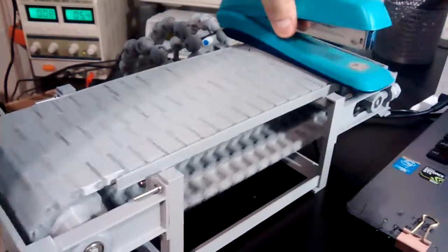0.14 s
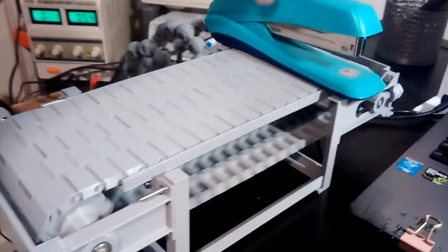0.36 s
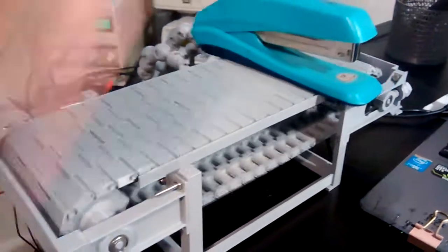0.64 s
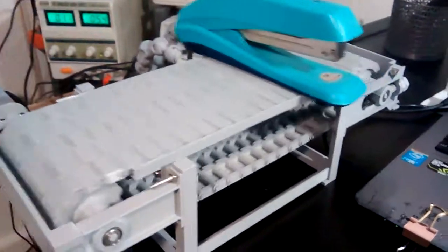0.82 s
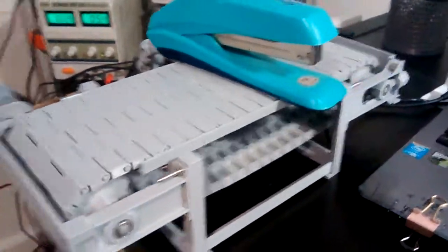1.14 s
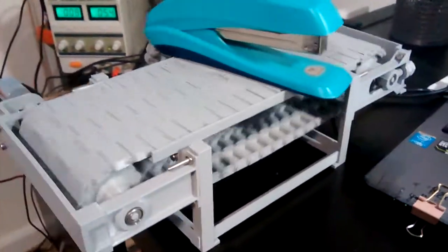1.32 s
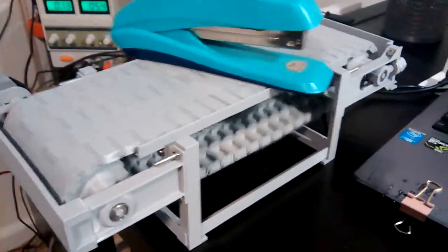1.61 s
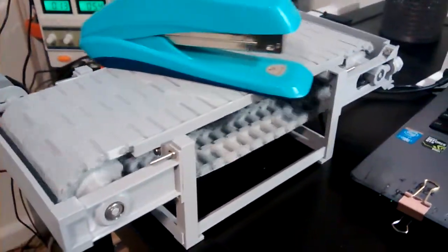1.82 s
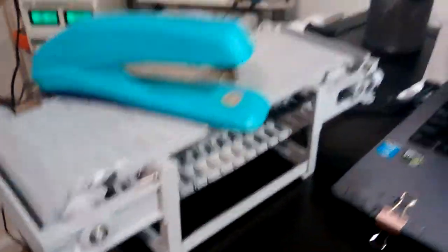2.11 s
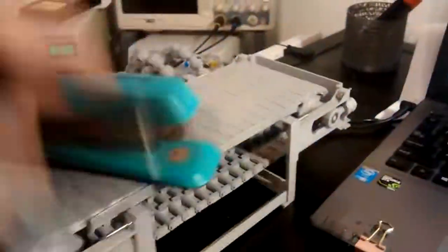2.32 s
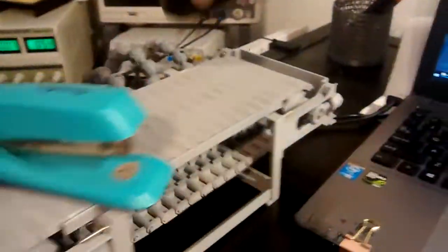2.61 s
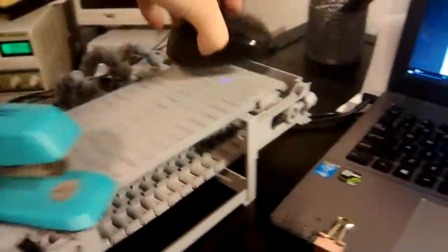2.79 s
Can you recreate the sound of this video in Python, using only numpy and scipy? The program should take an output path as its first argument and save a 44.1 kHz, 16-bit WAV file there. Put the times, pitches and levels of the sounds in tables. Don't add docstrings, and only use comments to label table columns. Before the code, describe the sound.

Plastic chain links rattle and crack over sprockets above a bright gear whirr and low hum, snaps crowding together around two seconds, then a soft object thud; recorded very close in stereo in a small room.

```python
import sys
import numpy as np
from scipy import signal
from scipy.fft import rfft, irfft, next_fast_len
from scipy.io import wavfile
from scipy.ndimage import map_coordinates

SR = 44100
rng = np.random.default_rng(int(sys.argv[2]) if len(sys.argv) > 2 else 0)


def gain_from_decibels(decibels):
    exponent = np.asarray(decibels, float) / 20
    return 10 ** exponent


def put_to_file(sound):
    columns = np.atleast_2d(sound).T
    safe = np.clip(columns, -1, 1)
    whole_steps = np.round(safe * 32767)
    wavfile.write(sys.argv[1], SR, whole_steps.astype(np.int16))


N = 130095
TIME_S = np.arange(N) / SR
PAD = next_fast_len(N + SR // 2)
HZ = np.arange(PAD // 2 + 1) * SR / PAD + 1e-3

# start_s, level_db
LOAD = [(0, -45.5), (.45, -45.5), (.9, -44), (1.15, -44), (1.8, -44.5), (2.2, -45), (2.3, -47.5),
        (2.6, -48), (2.95, -45.5)]
# pitch_hz, density_db_per_hz
WHIRR_COLOUR = [(150, -0.5), (1500, -6), (2600, -12.5), (3700, -8), (6500, -6), (10800, -6.5),
                (12300, -10.5), (15000, -5.5), (16000, -25)]
# pitch_hz, level_db, t60_s
GEAR_WHISTLES = [(4940, 1, 0.013), (5630, -14, 0.066), (6910, 10.5, 0.029), (8840, -2, 0.01),
                 (11400, -3.5, 0.017)]
# pitch_hz, level_db, t60_s
FRAME = [(193, -8.5, 0.038), (273.3, -1.5, 0.15), (344, 3.5, 0.27), (401, -3.5, 0.06), (496, 0, 0.068),
         (565.4, -4.5, 0.065), (717, -5, 0.031), (816, -8, 0.044), (902, -4, 0.049), (1201, -11, 0.04),
         (1393, -16, 0.016), (1785, -10.5, 0.048), (2067, -12, 0.009)]
# pitch_hz, level_db, t60_s
RUMBLE = [(38, -14.5, 0.038), (55.3, 1.5, 0.24), (106.2, -2, 0.13), (132.2, -3.5, 0.41)]
# start_s, pitch_hz, level_db
MOTOR_HUM = [(0, 347.3, -65), (.09, 346.6, -49), (.22, 344.3, -49), (.3, 345, -83), (.48, 344, -48.5),
             (.7, 344, -58), (.9, 343, -61), (1.1, 341, -58), (1.3, 338, -74), (1.52, 344, -52),
             (1.66, 336.3, -74), (1.85, 341, -55), (2.1, 339.5, -57.5), (2.4, 338.3, -56),
             (2.65, 341.4, -56.5), (2.8, 340.6, -53.5), (2.95, 344.6, -51)]
# start_s, crack_db,
# link_ring_db, frame_boom_db, desk_thump_db
LINK_SNAPS = [(0.0149, -25, -40, -14, -14.5), (0.044, -21, -33, -22, -17.5),
              (0.2162, -27.5, -17, -5.5, -8), (0.282, -19.5, -3, -16, -15.5),
              (0.3643, -24, -24.5, -13, -11), (0.374, -27.5, -50, -38, -54),
              (0.5057, -25.5, -19, -13, -13), (0.5221, -27.5, -19, -9.5, -19),
              (0.5327, -17.5, -28, -13.5, -25), (0.577, -22, -3, -25, -31), (0.6194, -21.5, -17, -7, -14),
              (0.6382, -19.5, -20, -12, -14), (0.6704, -20.5, -10, -29, -19),
              (0.7286, -12, -7, -15.5, -21), (0.853, -18.5, -6, -28, -22), (0.946, -14, -15.5, -18, -23),
              (0.9606, -29.5, -22, -17, -8.5), (1.066, -20.5, 0, -35, -18), (1.0789, -20.5, -29, -47, -43),
              (1.2421, -22.5, -4.5, -19, -20), (1.3253, -15.5, -9, -16, -30), (1.3959, -20, -29, -16, -24),
              (1.5018, -12, -3, -19, -16.5), (1.548, -24, -33, -12.5, -34),
              (1.6755, -24.5, -33, -36, -39), (1.7222, -23, -20, -30, -43), (1.7537, -18.5, 2, -14, -24),
              (1.781, -22.5, -10, -8.5, -15.5), (1.8276, -23.5, -2, -13, -14),
              (1.8454, -26.5, -2, -19, -17), (1.877, -15, -0.5, -20, -24), (1.9493, -28.5, -21, -5, -14),
              (2.0339, -16.5, 1.5, -29, -22.5), (2.0567, -25.5, 8.5, -18, -12), (2.126, -28, -16, -11, -18),
              (2.1365, -24.5, -7, -26, -15), (2.1381, -14.5, 1, -36, -21), (2.1862, -12, -2.5, -23.5, -23),
              (2.2028, -28.5, 8, -1, -11), (2.2256, -32, 5, -4, 2), (2.374, -24.5, -23, -9, -11.5),
              (2.387, -28.5, -25, -33, -35), (2.428, -29.5, 0.5, -13, -7.5), (2.487, -25.5, -13, -12, -11),
              (2.5263, -29, -22, -11, -22), (2.6337, -22.5, -48, -10, -15), (2.6432, -25.5, -23, -28, -33),
              (2.693, -22, -52, -6, -11), (2.726, -28.5, -2, -23, -17), (2.7806, -20, -28, -15, -17),
              (2.934, -28.5, -28, -2, -9), (2.9416, -20.5, -30, -12, -16)]
# start_s, level_db
TICKS = [(0.0084, -33), (0.152, -27.5), (0.2354, -32.5), (0.247, -25.5), (0.2714, -25), (0.44, -30.5),
         (0.656, -24), (0.922, -28), (1.129, -28.5), (1.457, -25), (1.977, -48), (2.168, -26), (2.191, -26),
         (1.2, -25), (2.717, -38), (2.762, -29), (2.846, -30), (1.3174, -50), (1.4154, -37), (1.488, -24),
         (1.5607, -27), (1.649, -27)]
# pitch_hz, level_db
CRACK_COLOUR = [(800, -1), (2000, -1), (2600, 2.5), (4500, 5.5), (6500, 8.5), (8500, 6.5), (11000, -3),
                (15500, -33)]
# pitch_hz, level_db, t60_s
LINK = [(3335, -6, 0.015), (3615, -4, 0.012), (3966, -2.5, 0.013), (4450, -2, 0.031)]
# start_s, level_db, pitch_hz
PINGS = [(.7298, -15.5, 3370), (1.5033, -18, 3540), (1.8785, -21, 3844), (2.1383, -10.5, 3720),
         (2.1922, -19, 3900)]
# start_s, level_db
GLINTS = [(0.731, -35), (0.946, -15), (1.398, -17), (1.502, -14), (1.876, -24.5), (2.035, -15),
          (2.1365, -32), (2.186, -17), (2.387, -20), (2.634, -31), (2.693, -15), (2.779, -23), (2.942, -31)]
# start_s, level_db, pitch_hz
KNOCKS = [(.878, -31.5, 760), (.893, -27.5, 760), (.930, -30.5, 800), (.979, -31.5, 910), (1.255, -38, 700),
          (1.504, -31, 360), (1.504, -31, 673), (2.191, -30.5, 430), (2.2, -28, 689.3), (2.894, -35, 514),
          (2.44, -30, 760)]
# start_s, length_s, pitch_hz, level_db
SQUEAKS = [
    (1.714, 0.043, 1148, -45.5),
    (2.252, 0.067, 1324, -47.5),
]
# start_s, level_db
THUD = [
    (2.881, -38),
    (2.905, -28.5),
    (2.914, -40.5),
]
# pitch_hz, level_db, shared_share (0-1), extra_phase_rad
RIGHT_PORT = [(81, -1, 0.39, 2.6), (310, -4, 0.99, 1.87), (800, -3.5, 0.99, 2.83), (1760, -1.5, 0.94, 3.5),
              (2260, -2.6, 1, 3.79), (2810, 3.5, 1, 3.5), (3470, -2.5, 0.98, 3.5), (4460, -0.7, 0.91, 3.37),
              (5370, -5, 0.99, 2.37), (7580, -14, 1, 4.15), (9400, -5.5, 0, 4.5), (15000, -11, 0.2, 1.3)]


def rms_one(x):
    return x / np.sqrt(np.mean(x ** 2) + 1e-20)


def at_hz(points, axis=1):
    points = np.array(points)
    return np.interp(np.log(HZ), np.log(points[:, 0]), points[:, axis])


def colour(x, points):
    cepstrum = irfft(at_hz(points) * np.log(10) / 20, PAD)
    cepstrum[1:PAD // 2] *= 2
    cepstrum[PAD // 2 + 1:] = 0
    return irfft(rfft(x, PAD) * np.exp(rfft(cepstrum)), PAD)[..., :N]


def body(x, modes):
    out = 0
    for k, (hz, db, t60) in enumerate(modes):
        radius = gain_from_decibels(-60 / (t60 * SR))
        gain = (1 - radius ** 2) / 2 * gain_from_decibels(db) * (-1) ** k
        poles = [1, -2 * radius * np.cos(2 * np.pi * hz / SR), radius ** 2]
        out = out + signal.lfilter([gain, 0, -gain], poles, x + 1e-18)
    return out


def drift(rate_hz):
    knots = rng.standard_normal(200)
    return map_coordinates(knots, [TIME_S * rate_hz * 2], order=3)


def envelope(start_s, db, rise_s, fall_s):
    clicks = np.zeros(N)
    places = ((start_s + 0.001) * SR).astype(int)
    np.add.at(clicks, np.clip(places, 0, N - 1), gain_from_decibels(db))
    t = np.arange(8000) / SR
    shape = (1 - np.exp(-(t + 1 / SR) / rise_s)) * np.exp(-t / fall_s)
    return signal.fftconvolve(clicks, shape / shape.max())[:N]


def bandpass(x, band_hz):
    return signal.sosfilt(signal.butter(2, band_hz, "band", fs=SR, output="sos"), x)


def struck_tones(events, t60_s, rise_s):
    out = 0
    for start_s, db, hz in events:
        age = np.maximum(TIME_S - start_s, 0)
        swell = gain_from_decibels(db - 60 * age / t60_s) * (1 - np.exp(-age / rise_s))
        out = out + swell * np.sin(2 * np.pi * hz * age)
    return out


def drive(load_db):
    grains_per_s, grain_spread_db = 5000, 3
    sizes = gain_from_decibels(grain_spread_db * np.minimum(rng.exponential(1, (3, 2, N)), 4))
    sizes = sizes * rng.choice([-1, 1], (3, 2, N))
    grains = sizes * (rng.random((3, 1, N)) < grains_per_s / SR)
    whirr = gain_from_decibels(-1 + 2 * drift(10)) * rms_one(colour(grains[0], WHIRR_COLOUR))
    gears = gain_from_decibels(-3 + 2 * drift(5.05)) * rms_one(body(grains[1], GEAR_WHISTLES))
    late_rise = np.clip(10 * (TIME_S - 2.5), 0, 1)
    gears = gears + gain_from_decibels(-10) * late_rise * rms_one(body(grains[0], GEAR_WHISTLES[3:4]))
    frame_hum = gain_from_decibels(-5) * rms_one(body(grains[2] * gain_from_decibels(5.3 * drift(12)), FRAME))
    return gain_from_decibels(load_db) * (whirr + gears + frame_hum)


def rumble():
    return gain_from_decibels(-54.5) * rms_one(body(rng.standard_normal((2, N)), RUMBLE))


def motor_hum():
    start_s, hz, db = np.transpose(MOTOR_HUM)
    waver_hz = 5.96
    pitch_hz = np.interp(TIME_S, start_s, hz) + waver_hz * drift(13)
    level_db = np.interp(TIME_S, start_s, db) - 1.5 + 5.0 * drift(11)
    return np.sqrt(2) * gain_from_decibels(level_db) * np.sin(2 * np.pi * np.cumsum(pitch_hz) / SR)


def snaps(start_s, db, ring_db, boom_db, thump_db):
    crack_db, shudder_db, lean_db = 2, -16.5, 2.0
    link_db, frame_db = 6.5, 11
    boom_rise_s, boom_fall_s = 0.0023, 0.01
    noise = np.clip(rng.standard_normal((3, 2, N)), -1, 1)
    knots = N // 70 + 2
    lumps = gain_from_decibels(8.3 * np.interp(np.arange(N) / 70, np.arange(knots), rng.uniform(-1.23, 1.61, knots)))
    rattle = lumps * envelope(start_s, db + shudder_db, 0.0012, 0.016)

    lean = lean_db * np.clip(rng.standard_normal((len(start_s), 4)), -1.5, 1.5)
    crack = 0
    for k, band_hz in enumerate([(500, 2600), (2600, 5200), (5200, 8200), (8200, 17000)]):
        shape = envelope(start_s, db + crack_db + lean[:, k], 0.00016, 0.001) + rattle
        crack = crack + bandpass(noise[0] * shape, band_hz)

    ring_push = envelope(start_s, db + ring_db + link_db, 0.00034, 0.00097) + gain_from_decibels(-11.0) * rattle
    ring = body(noise[1] * ring_push, LINK)
    boom_push = envelope(start_s, db + boom_db + frame_db, boom_rise_s, boom_fall_s)
    boom = body(noise[2] * boom_push, FRAME[6:])
    thump_push = envelope(start_s, db + thump_db + frame_db, boom_rise_s, boom_fall_s)
    thump = body(noise[2] * thump_push, FRAME[:6])
    return colour(crack, CRACK_COLOUR) + 3 * ring + 3 * (boom + thump)


def chain_links():
    ticks = [(start_s, db, -20, -25, -27) for start_s, db in TICKS]
    return snaps(*np.transpose(LINK_SNAPS + ticks))


def chatter(load_db):
    ticks_per_s, level_db, spread_db = 226, 13.5, 2.5
    count = 600
    start_s = np.sort(rng.uniform(0, N / SR, count))
    draw = rng.random((count, 4))
    keep = np.clip((ticks_per_s * N / SR / count - draw[:, 0]) * 8, 1e-4, 1)
    size_db = -spread_db * np.maximum(np.log(draw[:, 1]), -2.5)
    db = load_db[(start_s * SR).astype(int)] + level_db - 16 + size_db + 20 * np.log10(keep)
    return snaps(start_s, db, -18 + 10 * draw[:, 2], -18 + 10 * draw[:, 3], -20 + 10 * draw[:, 3])


def room(x):
    t60_s, level_db = 0.29, -18
    t = np.arange(SR // 3) / SR
    tail = rng.standard_normal((2, len(t))) * gain_from_decibels(-60 * t / t60_s) * (t > 0.004)
    tail = signal.lfilter([0.5], [1, -0.5], tail)
    tail = tail / np.sqrt(np.sum(tail[0] ** 2))
    return gain_from_decibels(level_db) * signal.fftconvolve(x[None], tail, axes=1)[:, :N]


def pings():
    return struck_tones(PINGS, t60_s=0.014, rise_s=0.00049)


def glints():
    start_s, db = np.transpose(GLINTS)
    burst = np.sign(rng.standard_normal(N)) * envelope(start_s, db, 0.0001, 0.00071)
    return bandpass(burst, (7300, 12500))


def knocks():
    return struck_tones(KNOCKS, t60_s=0.034, rise_s=0.00026)


def squeaks():
    out = 0
    for start_s, length_s, hz, db in SQUEAKS:
        swell = np.sin(np.pi * np.clip((TIME_S - start_s) / length_s, 0, 1))
        tone = np.sin(2 * np.pi * hz * TIME_S + 2.0 * drift(25))
        out = out + gain_from_decibels(db + 2 * drift(30)) * swell * tone
    return out


def thud():
    start_s, db = np.transpose(THUD)
    contact_s = 0.00039
    push = envelope(start_s, db, contact_s / 3, contact_s)
    return 8 * body(push, FRAME + RUMBLE[2:])


def phone_ports(x):
    one, two = rfft(x, PAD)
    lag_s = 0.0004288
    share = np.clip(at_hz(RIGHT_PORT, axis=2), 0, 1)
    phase = at_hz(RIGHT_PORT, axis=3) - 2 * np.pi * HZ * lag_s
    turn = gain_from_decibels(at_hz(RIGHT_PORT)) * np.exp(1j * phase)
    right = turn * (share * one + np.sqrt(1 - share ** 2) * two)
    return irfft([one, right], PAD)[:, :N]


def scene():
    load_db = np.interp(TIME_S, *np.transpose(LOAD))
    running = drive(load_db) + rumble() + motor_hum()
    hits = chain_links() + chatter(load_db) + pings() + knocks() + squeaks() + thud()
    return phone_ports(running + hits + room(hits[0]) + glints())


def low_pass(x):
    return signal.sosfilt(signal.butter(12, 16500, fs=SR, output="sos"), x)


def record(dry):
    limit, top_hz = 0.6, 16400
    rounded = limit * np.tanh(dry / limit)
    mix = signal.sosfilt(signal.cheby2(12, 40, top_hz, fs=SR, output="sos"), rounded)
    return low_pass(mix)


dry = scene()
out = record(dry)
put_to_file(out)
```